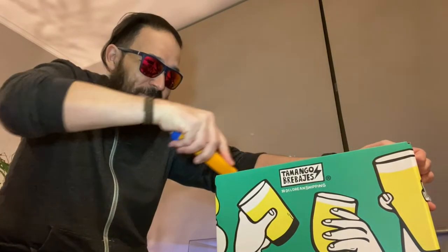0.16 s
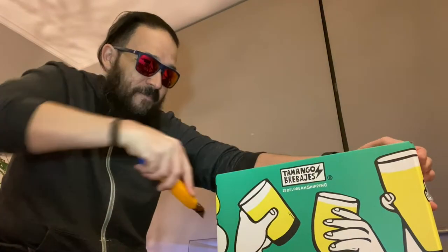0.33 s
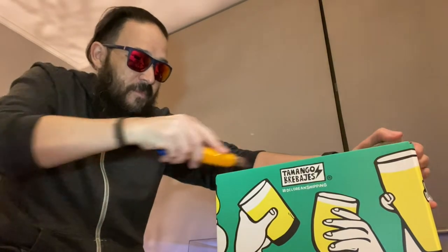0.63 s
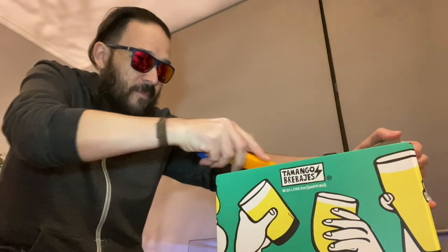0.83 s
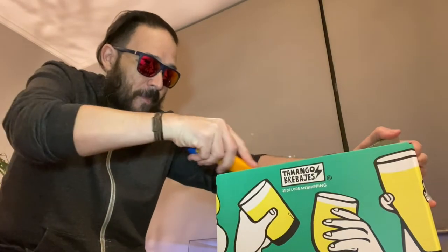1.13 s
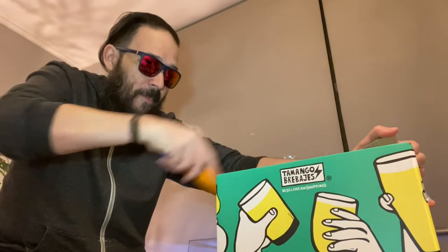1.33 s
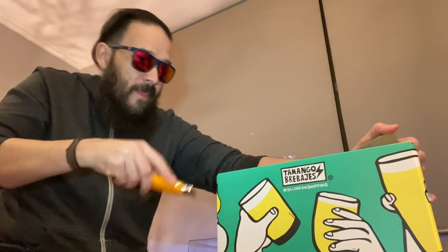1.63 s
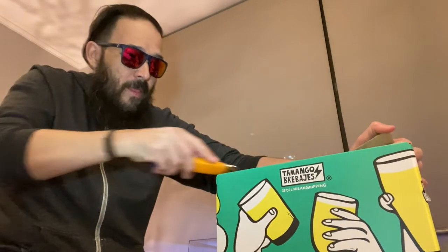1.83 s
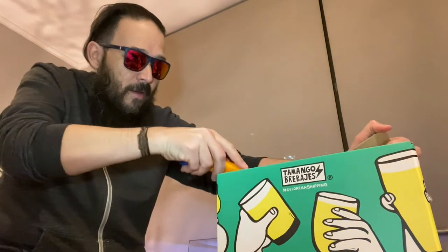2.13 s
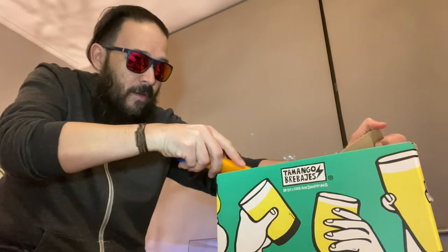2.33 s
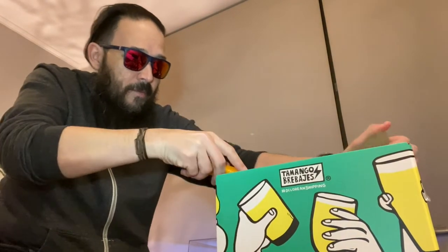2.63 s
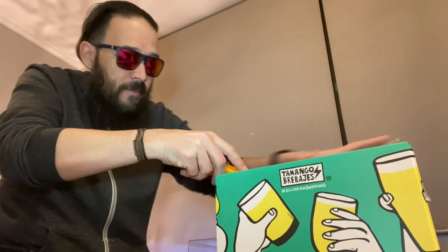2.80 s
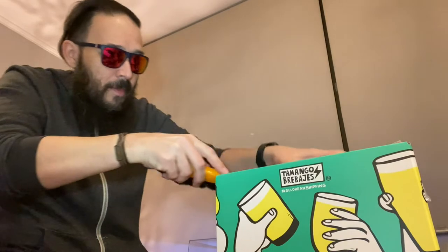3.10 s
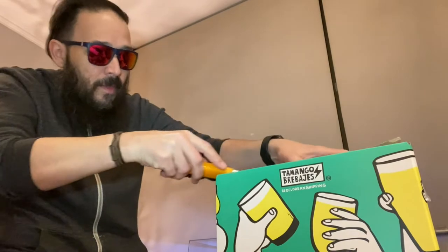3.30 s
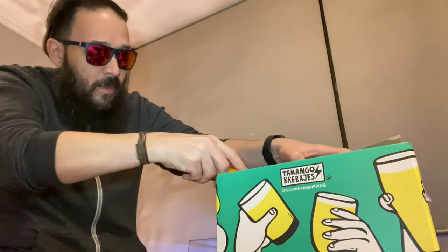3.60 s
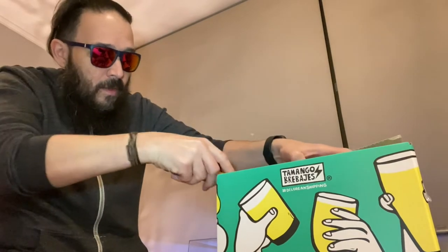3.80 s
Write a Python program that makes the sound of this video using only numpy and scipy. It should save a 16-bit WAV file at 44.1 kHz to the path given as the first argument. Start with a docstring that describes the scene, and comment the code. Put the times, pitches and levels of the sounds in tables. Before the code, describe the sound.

A knife cuts and scrapes through a taped cardboard box, with sharp hollow knocks between strokes.

```python
"""A knife saws and slices through the tape and cardboard of a box, a metre from a phone in a small room.
The blade sticks and slips: random dense clicks make its hiss and ring the modes of the hollow box.
Knocks and ticks strike the same box, each a crack, a short pitched tick and slower-building box notes.
A low hum, a sine gliding between about 55 and 85 Hz, swells over a quiet room rumble of shaped noise.
The small room answers with a short stereo echo, and two microphone ports pick everything up."""
import sys
import numpy as np
from scipy import signal
from scipy.fft import rfft, irfft
from scipy.io import wavfile
from scipy.ndimage import uniform_filter1d

SR = 44100
rng = np.random.default_rng(int(sys.argv[2]) if len(sys.argv) > 2 else 0)


def file_out(sig):
    """Save sig as 16-bit WAV at sys.argv[1]."""
    # one column per channel
    cols = np.atleast_2d(sig).T
    # limit, then scale
    lim = np.clip(cols, -1, 1)
    pcm = np.round(lim * 32767).astype(np.int16)
    wavfile.write(sys.argv[1], SR, pcm)


N = 174195  # samples
N_FFT = 2 ** 18
HZ = np.maximum(np.arange(N_FFT // 2 + 1) * SR / N_FFT, 1)  # frequency of each spectrum bin

# colour of the blade's hiss, also the basis of the cracks: f/Hz, relative level/dB
BLADE_COLOUR = [(530, -45), (900, -7.5), (1880, -13.5), (2300, -16), (2720, -12), (3150, -14), (3870, -16),
                (8760, -22.5), (15300, -36)]
# ringing modes of the hollow box: f/Hz, relative level/dB, t60/s
BOX_MODES = [(374.6, 2, 0.055), (432, 1.5, 0.052), (491, 7, 0.039), (599.6, 8, 0.021), (790, 1, 0.037),
             (950, 2.5, 0.0094), (1135, 2, 0.019), (1524, -1, 0.011)]


def undb(db):
    """dB to gain."""
    return 10 ** (np.asarray(db) / 20)


def unit(x):
    """Scale to rms 1."""
    return x / np.sqrt(np.mean(x ** 2))


def over_hz(table, hz=HZ):
    """Read a table of (f/Hz, value) on a log frequency axis."""
    t = np.array(table, float)
    return np.interp(np.log(hz), np.log(np.maximum(t[:, 0], 1)), t[:, 1])


def shape(x, gain):
    """Multiply the spectrum by a gain per frequency."""
    return irfft(rfft(x, N_FFT) * gain)[..., :N]


def octave_band(hz):
    """Cosine-shaped gain, one octave to either side of a centre frequency."""
    return np.cos(np.pi / 2 * np.clip(np.log2(HZ / hz), -1, 1))


def walk(rate):
    """Random levels held 1 / rate s, then slewed; rms 1."""
    hold = int(SR / rate)
    steps = np.repeat(rng.standard_normal(N // hold + 1), hold)
    slewed = uniform_filter1d(uniform_filter1d(steps, hold), hold)
    return unit(slewed[:N])


def pair(make):
    """A shared sound plus an unshared part of opposite sign left and right."""
    # width of echo and room air: f/Hz, level of the unshared part/dB
    width = [(60, -17), (250, -4), (1000, 5), (5000, 3.5), (9000, -6.5)]
    shared = make()
    unshared = shape(make(), undb(over_hz(width)))
    return shared + unshared * np.array([[1], [-1]])


def room_air():
    """The room's rumble: random noise, mostly low, whose level drifts slightly."""
    # colour of the rumble: f/Hz, relative level/dB
    colour = [(20, -7.5), (55, 5), (200, -8), (600, -33.5), (3000, -45.5), (9000, -57), (15000, -60)]
    level_db, drift_db, drift_hz = -38.5, 0.5, 5.07

    def one_side():
        noise = unit(shape(rng.standard_normal(N), undb(over_hz(colour))))
        return noise * undb(drift_db * walk(drift_hz))

    return undb(level_db) * pair(one_side)


def hum():
    """A low sine glides in pitch, swells in level and wavers at random in phase."""
    # swells: t/s, level/dB
    swells = [(0.0, -26.5), (0.36, -42.5), (0.45, -39), (0.53, -37), (1.14, -26), (1.21, -47), (1.42, -27),
              (1.46, -41.5), (1.54, -23), (1.76, -56), (2.21, -35.5), (2.24, -77), (2.55, -33), (2.57, -46),
              (3.23, -38.5), (3.82, -59), (3.88, -17), (3.95, -56)]
    # pitch glide: t/s, f/Hz
    glide = [(0.0, 75.7), (2.11, 68.8), (2.35, 84.7), (2.9, 55.87), (3.95, 84.84)]
    waver_hz, waver_rad = 5.18, 0.44
    t = np.arange(N) / SR
    phase = 2 * np.pi * np.cumsum(np.interp(t, *np.array(glide).T)) / SR
    tone = unit(np.sin(phase + waver_rad * walk(waver_hz)))
    return tone * undb(np.interp(t, *np.array(swells).T))


def echo():
    """Room response: noise in octave bands builds up, each band fading at its own rate."""
    # reverberation of the small room: f/Hz, t60/s
    reverb = [(100, 0.76), (1000, 0.29), (5000, 0.33), (13000, 0.25)]
    build_s = .008
    t, noise, out = np.arange(N) / SR, rng.standard_normal(N), 0
    for hz in 60 * 2. ** np.arange(9):
        band = shape(noise, octave_band(hz) ** 2)
        out = out + band * undb(-60 * t / over_hz(reverb, hz))
    out = out * (1 - np.exp(-(t / build_s) ** 2))
    return out / np.sqrt(np.sum(out ** 2))  # unit energy


def add_echo(box):
    """Add the echo of the box, and of a stroke already under way, by convolution with the room."""
    # colour of the echo: f/Hz, gain/dB
    colour = [(100, -5), (500, -4), (2000, -1), (12000, -1)]
    echo_db, lead_in = -6, 5000  # lead-in in samples
    room = rfft(pair(echo), N_FFT) * undb(over_hz(colour) + echo_db)
    # the opening, reversed, stands in for the sound just before it; only its echo is heard
    earlier = box[lead_in:0:-1]
    tail = irfft(rfft(earlier, N_FFT) * room)[:, lead_in:lead_in + N]
    return box + tail + shape(box, room)


def fade(t, t60, rise):
    """Decay by 60 dB in t60 s, after a smooth build-up with time constant rise in s."""
    return np.exp(-np.log(1000) * t / t60) * (1 - np.exp(-t / rise)) ** 2


def tone(t, hz, t60, cycles):
    """A struck note whose build-up takes a given number of cycles, so low notes come later."""
    return fade(t, t60, cycles / hz) * np.sin(2 * np.pi * hz * t)


def make_cracks(count):
    """Noise bursts with random phases, a smooth spectrum and no lows, scaled to peak 1."""
    crack_t60_s, tilt_db = .012, 2.5  # tilt: dB per octave brighter than the hiss
    size = 1024
    envelope = fade(np.arange(size) / SR, crack_t60_s, .0005)
    burst = rfft(rng.standard_normal((count, size)) * envelope)
    hz = np.arange(1, size // 2 + 2) * SR / size
    gain = undb(over_hz(BLADE_COLOUR, hz) + tilt_db * np.log2(hz)) * (hz > 700)
    cracks = irfft(burst / abs(burst) * gain)  # only the phases of the burst remain
    return cracks / abs(cracks).max(axis=1, keepdims=True)


def knocks():
    """Each blow gives a crack, a short tick and box modes that build up over some cycles."""
    # knocks and ticks: t/s, tick level/dB, crack peak level/dB, box ring level/dB, tick f/Hz
    hits = [(0.1521, -6, -13, -32, 2460), (0.1545, -23, -18, -53, 3650), (0.161, -26, -50, -34.5, 2270),
            (0.415, -20, -21, -21, 1263), (0.719, -22, -30.5, -47, 1570), (0.779, -34.5, -63, -46, 1100),
            (0.838, -49, -51, -45.5, 972), (0.874, -24.5, -31, -44, 1240), (0.909, -24, -24, -35, 1420),
            (0.976, -22, -33, -43, 2920), (0.998, -27, -24, -41, 1290), (1.0204, -22.5, -18.5, -43, 1440),
            (1.044, -17, -19, -41, 1380), (1.113, -22, -30, -30.5, 3450), (1.171, -17, -30, -32, 1130),
            (1.2707, -20, -14.5, -24.5, 2700), (1.389, -28.5, -39, -44.5, 1710),
            (1.533, -28, -35, -44, 1170), (1.582, -29.5, -43, -35.5, 1410),
            (1.751, -32.5, -37.5, -39.5, 1640), (1.843, -37, -57, -41.5, 1080),
            (1.983, -57, -44, -32.5, 1040), (2.084, -31.5, -49, -55, 3060), (2.138, -8, -14, -20.5, 3630),
            (2.1439, -20.5, -25, -26.5, 4020), (2.522, -36, -38, -36, 990), (2.621, -34, -24.5, -44, 1300),
            (2.883, -37, -55, -39.5, 1130), (2.965, -24, -25, -35.5, 1470), (3.095, -31.5, -54, -80, 3320),
            (3.387, -53, -48, -42.5, 980), (3.508, -45, -40, -32, 1050), (3.64, -50, -74, -42, 1040),
            (3.778, -22, -26, -41, 1960), (3.845, -6, -10.5, -15.5, 1657), (3.853, -34, -25.5, -27, 2430),
            (3.857, -8, -40, -44, 880), (3.926, -22, -28.5, -29, 1400)]
    # notes that stand out of the stronger blows: t/s, level before build-up/dB, f/Hz, t60/s
    thuds = [(0.153, -15, 162.6, 0.072), (.418, -16, 608, 0.025), (.42, -18, 298, 0.032),
             (.42, -7, 163, 0.089), (0.424, -14, 94, 0.16), (0.91, -22.5, 150, 0.12),
             (1.045, -9.5, 147, 0.037), (1.106, -13.5, 474, 0.045), (1.117, -9.5, 122, 0.135),
             (1.259, -14, 340, 0.073), (1.2709, -2, 154, 0.051), (1.325, -24.5, 320.6, 0.19),
             (1.585, -33, 187, 0.089), (2.141, -14, 784, 0.037), (2.143, -11.5, 518, 0.053),
             (2.147, -27.5, 196, 0.19), (2.585, -32.5, 204.7, 0.53), (2.886, -25.5, 104.4, 0.15),
             (3.241, -25, 92.5, 0.25), (3.507, -15, 136, 0.033), (3.846, -0.5, 528, 0.027),
             (3.851, -6.5, 359, 0.06), (3.856, -0.5, 142, 0.063), (3.899, -17, 166, 0.19)]
    tick_cycles, tick_partials = 18, (.84, 1, 1.22)  # t60 in cycles; multiples of the tick pitch
    mode_scatter_db, pitch_scatter, rise_cycles = 1.5, .035, .6
    out, t = np.zeros(N + SR), np.arange(SR // 3) / SR
    scatter = rng.standard_normal((len(hits), 2, len(BOX_MODES)))
    cracks = make_cracks(len(hits))
    for (s, tick_db, crack_db, ring_db, tick_hz), (dlevel, dpitch), crack in zip(hits, scatter, cracks):
        blow = np.zeros(len(t))
        for m in tick_partials:
            gain = undb(tick_db - 30 * abs(m - 1))  # outer partials are weaker
            blow += gain * tone(t, m * tick_hz, tick_cycles / tick_hz, .5)
        blow[:len(crack)] += undb(crack_db) * crack
        for k, (f, db, t60) in enumerate(BOX_MODES):
            gain = undb(ring_db + db + mode_scatter_db * dlevel[k])
            blow += gain * tone(t, f * (1 + pitch_scatter * dpitch[k]), t60, rise_cycles)
        start = int(s * SR)
        out[start:start + len(t)] += blow
    for s, db, f, t60 in thuds:
        start = int(s * SR)
        out[start:start + len(t)] += undb(db) * tone(t, f, t60, rise_cycles)
    return out[:N]


def clicks():
    """Dense stick-slip clicks: random moments, sizes and signs, with a juddering level."""
    clicks_per_s, spread_db, judder_db, judder_hz = 1800, 4, 1.5, 60
    chance, size_draw, sign_draw = rng.random((3, N))
    size = undb(-spread_db * np.log(1 - .985 * size_draw)) * np.sign(sign_draw - .5)
    happens = chance < clicks_per_s / SR
    return unit(happens * size * undb(judder_db * walk(judder_hz)))


def ring(x, hz, t60):
    """One decaying mode, driven by x through a one-pole complex resonator."""
    pole = np.exp(2j * np.pi * hz / SR - np.log(1000) / (max(t60, .003) * SR))
    return signal.lfilter([1], [1, -pole], x).imag


def blade():
    """Clicks hiss off the blade and ring the box modes, as hard as each stroke presses."""
    # one list per stroke of the blade: t/s, hiss level/dB, box ring level/dB
    strokes = [
        [(0.0, -39.5, -35.5), (0.06, -37, -42.5), (0.11, -33, -31.5), (0.17, -45, -41)],
        [(0.66, -55.5, -60), (0.776, -58, -62), (0.87, -63, -52)],
        [(0.87, -50, -50), (0.952, -48, -44), (1.05, -60, -41), (1.08, -38, -33)],
        [(1.08, -36.5, -37.5), (1.172, -34, -35.5), (1.25, -29, -31), (1.3, -65, -46)],
        [(1.5, -72, -47.5), (1.586, -47.5, -46), (1.68, -94, -53.5)],
        [(1.68, -52.5, -54.5), (1.9, -66, -50)],
        [(1.9, -61, -49.5), (2.056, -84, -59), (2.13, -56, -47.5)],
        [(2.15, -78, -46), (2.196, -52, -34.5), (2.306, -54, -56), (2.35, -59, -60)],
        [(2.47, -59.5, -71), (2.58, -53, -43)],
        [(2.58, -43, -45), (2.76, -70, -55.5)],
        [(2.84, -52, -57.5), (2.96, -52, -41.5)],
        [(2.96, -71, -51), (3.032, -82, -52), (3.1, -60, -87)],
        [(3.1, -63, -78), (3.322, -72, -61), (3.45, -88, -69)],
        [(3.5, -58, -71), (3.64, -100, -76)],
        [(3.64, -59, -63), (3.84, -61.5, -43.5)],
        [(3.87, -45.5, -49), (3.95, -38.5, -31)],
    ]
    t, rows = np.arange(N) / SR, np.concatenate(strokes)
    cutting = sum((t >= s[0][0]) & (t < s[-1][0]) for s in strokes) > 0
    gate = uniform_filter1d(1. * cutting, size=200)  # softened starts and stops
    # fibres of each size tear at their own moments, so each octave has its own clicks
    fibres = sum(shape(clicks(), octave_band(hz)) for hz in 700 * 2. ** np.arange(6))
    hiss = unit(shape(fibres, undb(over_hz(BLADE_COLOUR)) * (HZ > 700)))
    drive = clicks()
    panels = unit(sum(undb(db) * ring(drive, hz, t60) for hz, db, t60 in BOX_MODES))
    hiss_gain = undb(np.interp(t, rows[:, 0], rows[:, 1]))
    panel_gain = undb(np.interp(t, rows[:, 0], rows[:, 2]))
    return gate * (hiss * hiss_gain + panels * panel_gain)


def scene():
    """Blade and knocks on the box with their echo, over the hum and the room air."""
    return add_echo(blade() + knocks()) + hum() + room_air()


def record(dry):
    """Two microphone ports differ in phase and level by frequency; a steep low-pass cuts the top."""
    # phase between the ports: f/Hz, lead of the left/rad
    lead = [(0, 0), (520, -.8), (1290, -1.2), (3100, -2.2), (5430, -2.5), (7600, 0), (8350, 0), (9800, 3),
            (11200, 3.2), (12100, 6.2), (13900, 6.3), (15000, 9.4)]
    # balance of the ports: f/Hz, left minus right/dB
    balance = [(60, -3), (200, 1.5), (690, -3.5), (2400, 0), (14000, -0.5)]
    top_hz = 15400
    phase = np.interp(HZ, *np.array(lead).T)
    half = undb(over_hz(balance) / 2) * np.exp(.5j * phase)  # each port takes half the difference
    ports = shape(dry, np.array([half, 1 / half]))
    low_pass = signal.ellip(8, .2, 70, top_hz, fs=SR, output="sos")
    return signal.sosfilt(low_pass, ports)


dry = scene()
out = record(dry)
file_out(out)
```